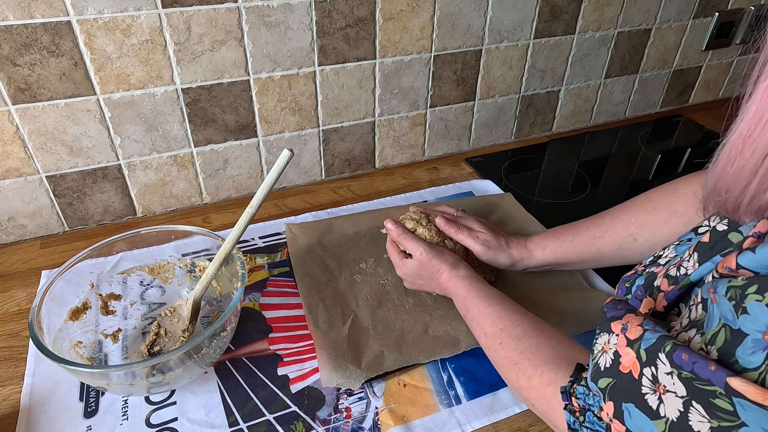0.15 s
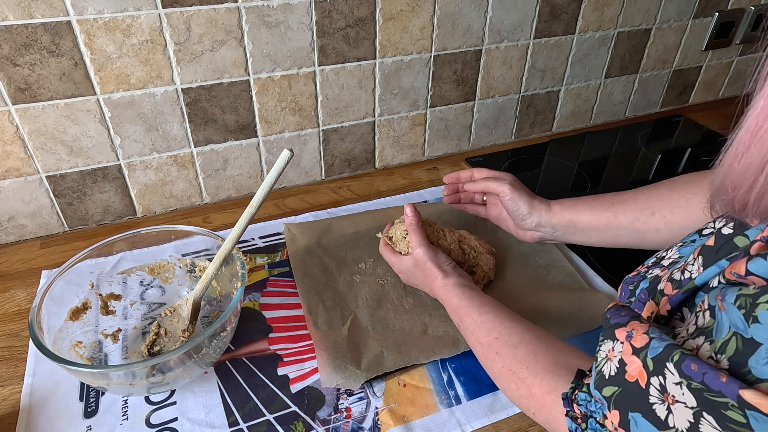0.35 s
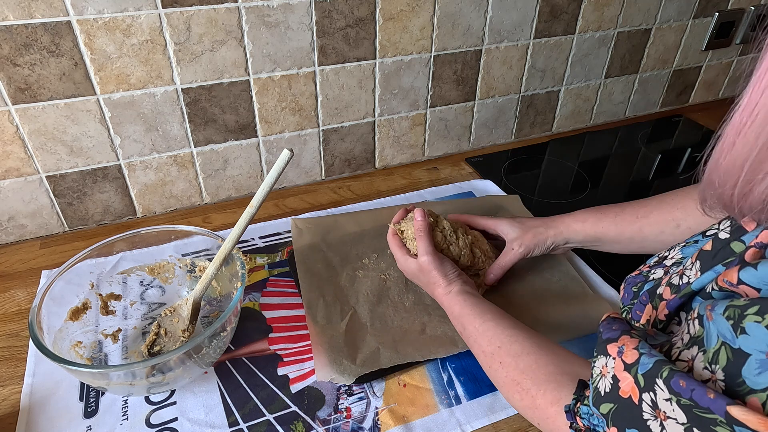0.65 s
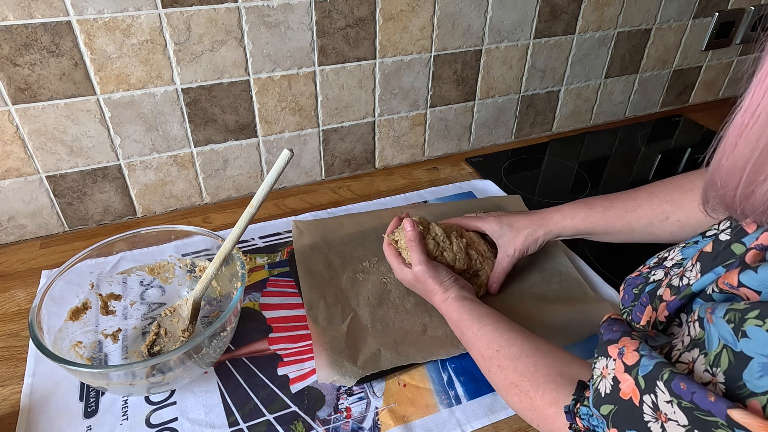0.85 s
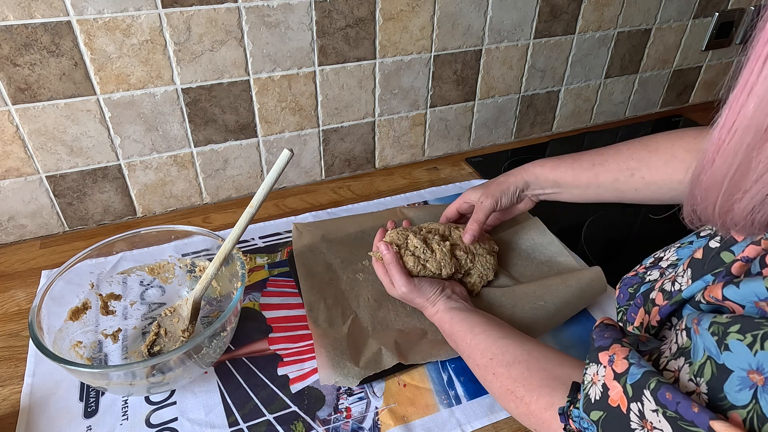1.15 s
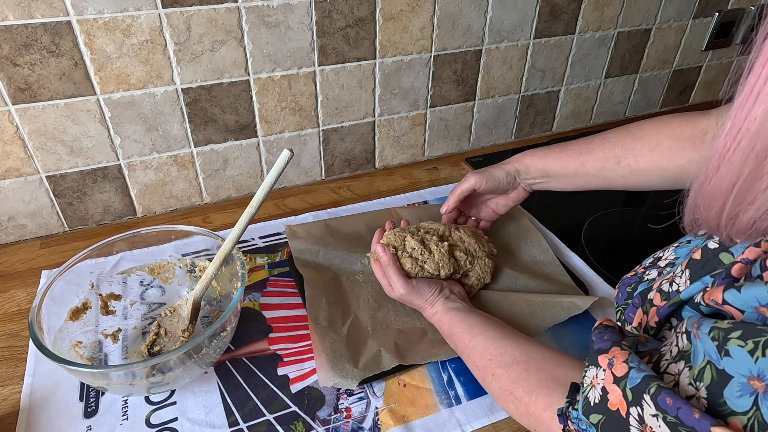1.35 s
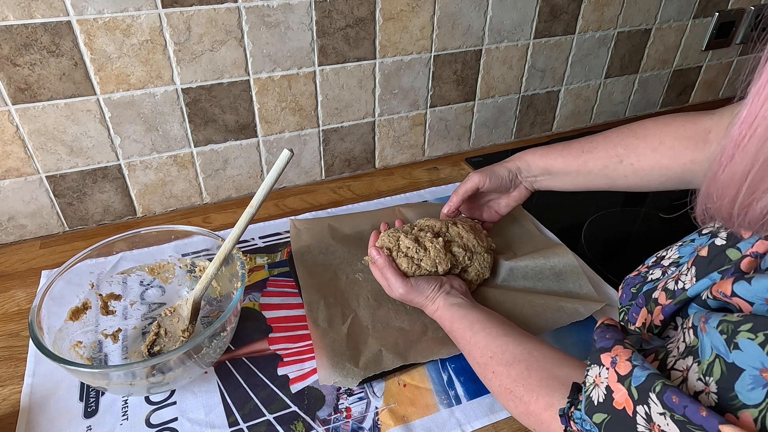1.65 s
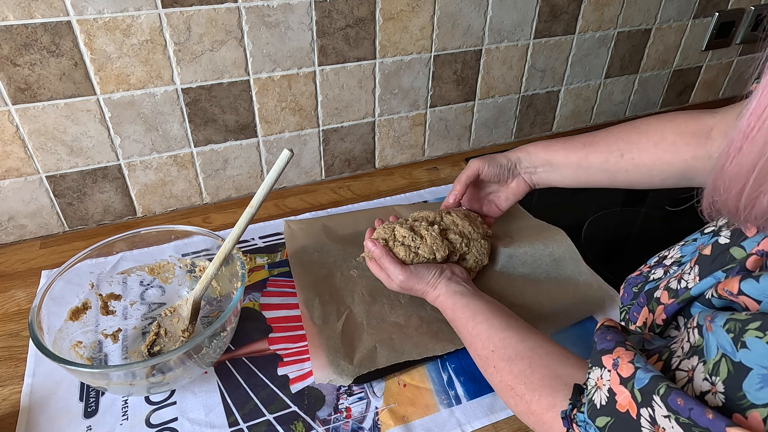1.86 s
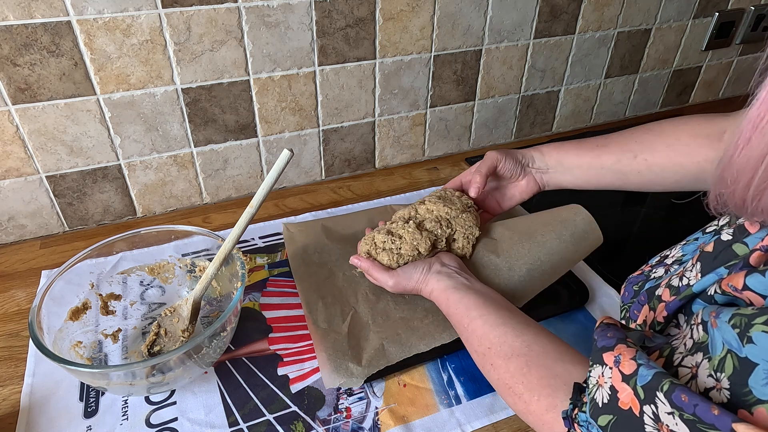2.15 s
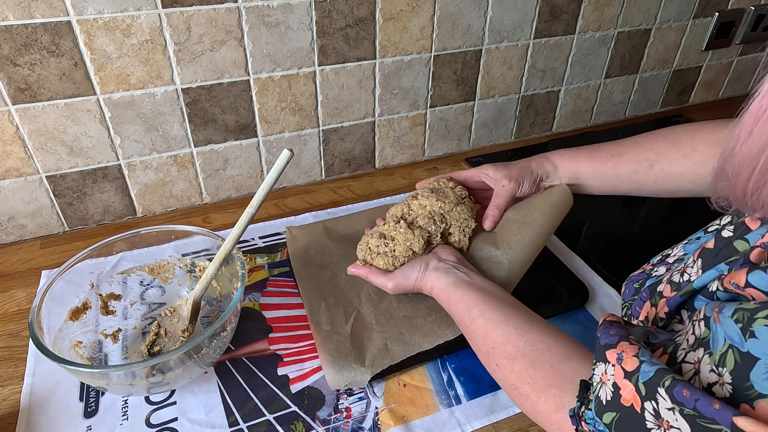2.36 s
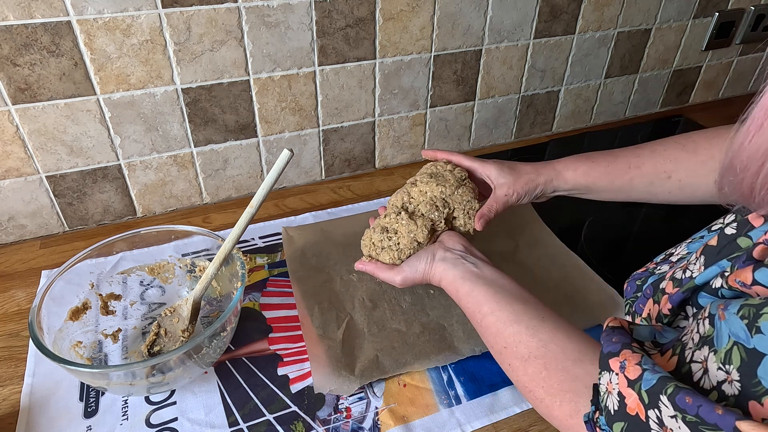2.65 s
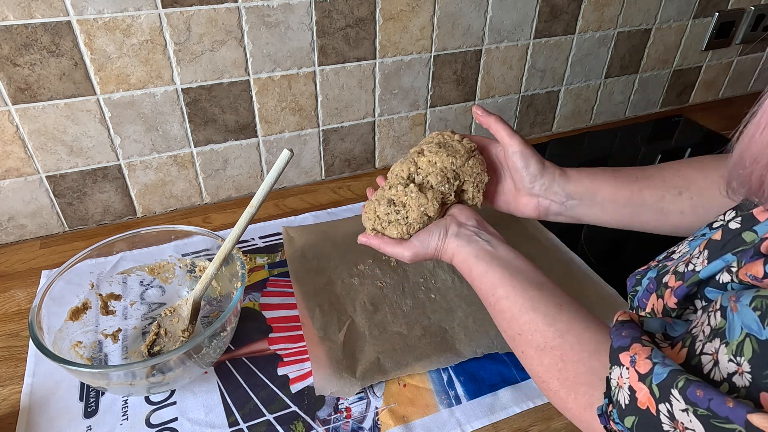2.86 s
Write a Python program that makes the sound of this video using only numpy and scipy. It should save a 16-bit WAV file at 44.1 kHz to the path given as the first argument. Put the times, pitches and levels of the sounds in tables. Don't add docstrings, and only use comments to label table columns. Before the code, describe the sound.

Baking paper crinkles and snaps under hands handling dough in a small kitchen, fridge humming faintly

```python
import sys
import numpy as np
from scipy import signal
from scipy.fft import rfft, irfft
from scipy.io import wavfile
from scipy.ndimage import uniform_filter1d

SR = 44100
rng = np.random.default_rng(int(sys.argv[2]) if len(sys.argv) > 2 else 0)


def master(y):
    cut = np.clip(np.atleast_2d(y).T, -1, 1)
    pcm = np.round(cut * 32767)
    wavfile.write(sys.argv[1], SR, pcm.astype(np.int16))


def ratio_of_db(decibels):
    return 10 ** (np.asarray(decibels, float) / 20)


N = 132300
SCATTER = 0.2

# f/Hz, level/dB rms
HUM_LINES = [(49.1, -42), (100, -104), (135, -69.5), (200, -67.5), (250, -71)]
# f/Hz, density/dB per Hz
AIR_SPECTRUM = [(41, -41), (70, -7.5), (108, -9.5), (254, -19.5), (840, -41.5), (1030, -35), (3820, -52),
                (7190, -40.5), (15500, -66)]
# f/Hz, t60/s
KITCHEN_T60 = [(300, 0.3), (1500, 0.45), (5000, 0.38), (12000, 0.28)]
# f/Hz, density/dB per Hz
COUNTER_SPECTRUM = [(100, -9.5), (170, 2.5), (350, 4), (750, -1.5), (1100, -10), (3000, -28.5)]
# t/s, level/dB, rise/s, t60/s
THUMPS = [
    (0.263, -35, 0.0012, 0.1),
    (.72, -42, 0.03, 0.23),
    (1.0, -51, .01, 0.36),
    (1.09, -56, 0.014, 0.12),
    (1.586, -45, 0.0049, 0.32),
    (1.97, -57, 0.021, 0.16),
    (2.41, -58, .01, 0.61),
]
# t/s, peak/dB, ring f/Hz
PATS = [(.2645, -37.5, 258), (.2645, -37.5, 423), (.2645, -36, 592), (.2645, -38, 730), (.294, -38.5, 595),
        (2.055, -31.5, 538), (2.129, -33.5, 950), (2.265, -40, 735), (2.41, -33, 746), (2.474, -42, 782),
        (2.663, -42.5, 750), (2.715, -46.5, 717)]
# f/Hz, density/dB per Hz
PAPER_SPECTRUM = [(200, -31.5), (600, -16), (1000, -5), (1700, 0), (3100, 0.5), (6800, -6), (8500, -13),
                  (15500, -26.5)]
# f/Hz, density/dB per Hz
FLEX_SPECTRUM = [(120, -26), (300, 0), (600, 1.5), (1000, 0), (2000, -1.5), (5000, -30.5)]
# t/s, peak/dB, ring f/Hz, treble/dB
SNAPS = [(0.2648, -21, 3500, -20), (0.599, -30, 3080, -15), (0.9667, -22, 1920, -17),
         (1.0036, -19, 1720, -24), (1.1064, -17, 3710, -18), (1.1727, -16, 2430, -20),
         (1.1937, -14, 2380, -24), (1.2211, -22, 1910, -22), (1.2675, -15, 3000, -21),
         (1.2968, -12, 3000, -21), (1.3927, -12, 5030, -16), (1.5514, -23, 2150, -21),
         (1.5833, -21, 3480, -20), (1.6901, -21, 3350, -15), (1.7145, -16, 2250, -19),
         (1.9205, -19, 2780, -24), (2.1291, -16, 4000, -16), (2.2957, -22, 2400, -23),
         (2.4219, -21, 3120, -21), (2.4703, -18, 4000, -21)]
# t/s, peak/dB, ring f/Hz, treble/dB
TICKS = [(0.2222, -44, 4500, -30), (0.4393, -35, 2800, -23), (0.5258, -46, 10000, -28),
         (0.5556, -37.5, 2640, -37), (0.6755, -24.5, 3170, -16), (0.7160, -20.5, 2960, -24),
         (0.7484, -28.5, 2830, -21), (0.792, -21, 2460, -24), (0.9814, -19.5, 1770, -20),
         (1.0454, -30, 1720, -17), (1.0858, -19.5, 2850, -27), (1.0964, -23, 2520, -15),
         (1.1783, -22, 6000, -21), (1.3456, -20.5, 3200, -22), (1.4554, -25.5, 2500, -14),
         (1.6048, -22.5, 2260, -21), (1.6588, -22.5, 2880, -15), (1.8591, -20, 3380, -31),
         (1.9713, -25, 1310, -19), (2.0142, -25, 3330, -33), (2.1412, -25.5, 3100, -9),
         (2.2853, -42, 3970, -23), (2.3545, -32, 3260, -29), (2.4098, -20.5, 2530, -29),
         (2.7706, -31.5, 2940, -32), (2.8347, -36.5, 2850, -24), (2.898, -31.5, 4740, -43)]
# t/s, peak/dB, ring f/Hz, treble/dB
FLICKS = [(0.5173, -45, 2700, -30), (0.5746, -39, 4500, -31), (0.5861, -33, 2000, -30),
          (0.6174, -29.5, 1910, -22), (0.6515, -28, 3220, -22), (0.7962, -24, 5960, -17),
          (0.8201, -29, 2770, -29), (1.2541, -24, 5500, -30), (1.2905, -21.5, 11000, -14),
          (1.641, -25.5, 2230, -19), (1.8105, -29.5, 1790, -24), (2.0443, -22, 6000, -17),
          (2.0505, -20, 2840, -18), (2.0585, -20, 3200, -15), (2.2576, -31, 2840, -31),
          (2.3839, -27.5, 2460, -25), (2.3947, -29, 2630, -24), (2.4274, -35, 2930, -18),
          (2.71, -38, 5500, -30), (2.8858, -38, 3700, -31)]
# centre t/s, length/s, level/dB, ring f/Hz, ring level/dB
CRUSHES = [(0.31, 0.044, -49, 2500, -11), (0.351, .015, -52, 2700, 2.5), (0.408, 0.029, -54.5, 2450, 1),
           (0.586, 0.033, -50.5, 1810, 1), (0.603, 0.0092, -44.5, 7500, 12.5),
           (0.63, 0.093, -49.5, 2890, 0), (0.71, 0.06, -35.5, 2870, -3.5), (0.746, 0.023, -37.5, 3520, -5),
           (.77, 0.022, -40, 2800, -13), (0.799, 0.028, -34.5, 2700, -9), (1.028, 0.17, -39.5, 2360, -1.5),
           (1.107, 0.02, -33.5, 3050, -5), (1.195, 0.012, -39, 2640, -6), (1.276, 0.041, -38, 2570, -11),
           (1.312, 0.064, -32.5, 2500, -16), (1.416, 0.029, -33, 3450, -26), (1.476, 0.047, -40, 2840, -14),
           (1.594, 0.047, -33.5, 2380, -9), (1.723, 0.02, -41, 3000, -13), (1.756, 0.02, -39.5, 6000, 4.5),
           (1.847, 0.055, -39.5, 2920, -7), (1.976, 0.038, -34, 2480, -5.5), (2.023, 0.036, -39, 2900, 2),
           (2.056, 0.029, -29, 3150, -2.5), (2.137, 0.012, -38, 2500, 0), (2.314, 0.033, -53, 2800, 7),
           (2.419, 0.052, -40, 2730, -8), (2.434, 0.018, -47, 3000, -3), (2.496, 0.061, -44.5, 2870, 5),
           (2.641, 0.028, -47, 4050, 3.5), (2.669, 0.04, -47, 2000, -2), (2.722, 0.052, -48, 2700, 6)]
# t/s, rustle level/dB, dullness/0-1
EFFORT = [(0, -76, .4), (.21, -79.5, .4), (0.229, -56.5, 0), (.42, -56.5, 0), (.5, -65, 0), (.57, -62.5, 0),
          (.66, -41, 0.3), (.86, -43.5, 0.53), (.94, -42.5, 0.6), (1.04, -40, 0.84), (1.3, -36, 0.46),
          (1.53, -47, 0.54), (1.65, -42.5, 0.34), (1.8, -47, 0.2), (2.02, -38.5, 0.69), (2.22, -51, 1),
          (2.58, -51, 0.7), (3, -61, 0)]
# f/Hz, gain/dB
TREBLE_RESPONSE = [(3200, 0), (4100, -2), (5200, 0), (8800, -1), (10500, 1.5), (11500, -2), (13500, -6),
                   (15700, -13)]


def evened(x):
    return x / np.sqrt(np.mean(x ** 2) + 1e-20)


def read(points, hz):
    f, value = np.transpose(points)
    return np.interp(np.log(hz + 1), np.log(f + 1), value)


def colour(x, points):
    log_gain = np.log(ratio_of_db(read(points, abs(np.fft.fftfreq(4096, 1 / SR)))))
    taps = np.fft.ifft(np.exp(np.conj(signal.hilbert(log_gain)))).real[:2048]
    taps = taps.reshape((1,) * (x.ndim - 1) + (-1,))
    return signal.oaconvolve(x, taps, axes=-1)[..., :N]


def ring(x, hz, width_hz):
    b, a = signal.iirpeak(min(hz, SR / 3), max(hz / width_hz, 0.3), SR)
    return signal.lfilter(b, a, x)


def highpass(order, hz):
    return signal.butter(order, hz, "high", fs=SR)


def drift(rate_hz):
    t = np.arange(N) / SR
    rates_hz = np.geomspace(rate_hz / 10, rate_hz, 20)
    return evened(sum(np.sin(2 * np.pi * (f * t + rng.random())) for f in rates_hz))


def crackle(per_s, clump_db=4.5, spread_db=3):
    clumps = ratio_of_db(clump_db * evened(uniform_filter1d(rng.standard_normal(N), 200)))
    size = ratio_of_db(spread_db * np.minimum(rng.exponential(1, N), 4))
    size = size * (rng.random(N) < clumps * per_s / SR)
    kind = rng.integers(0, 24, N)
    shapes = rng.standard_normal((24, 160))
    sides = np.linspace(-1, 1, 24)
    t = np.arange(160)
    out = np.zeros((2, N))
    for k in range(24):
        decay_samples = 5.6 + 4.6 * (k % 8)
        grain = evened(shapes[k] * np.exp(-t / decay_samples))
        train = signal.oaconvolve(size * (kind == k), grain)[:N]
        out[0] += (1 + SCATTER * sides[k]) * train
        out[1] += (1 - SCATTER * sides[k]) * np.roll(train, round(0.6 * sides[k]))
    return evened(out)


def room_tone():
    level_db = -58.5
    shared, left, right = rng.standard_normal((3, N))
    apart = 1.56 * signal.lfilter(*highpass(1, 600), np.array([left, right]))
    return ratio_of_db(level_db) * evened(colour(shared + apart, AIR_SPECTRUM))


def fridge():
    waver_db, low_db, rumble_db = 0.7, -58.5, -55
    rumble_hz, rumble_width_hz = 50, 14
    t = np.arange(N) / SR
    lines = np.zeros(N)
    for hz, db in HUM_LINES:
        level = np.sqrt(2) * ratio_of_db(db + waver_db * drift(11))
        lines += level * np.sin(2 * np.pi * (hz * t + rng.random()))
    noise = rng.standard_normal(N)
    low = evened(ring(noise[::-1], 32, 15))
    rumble = ring(noise, rumble_hz, rumble_width_hz)
    rumble = evened(ring(rumble, rumble_hz, rumble_width_hz))
    return lines + ratio_of_db(low_db) * low + ratio_of_db(rumble_db) * rumble


def kitchen(x):
    apart_hz, apart_db = 880, -3.5
    out = np.zeros((2, N))
    turn = np.arange(N) / SR * 40 / 6
    source = x.mean(0)
    for k in range(6):
        taps = np.zeros((2, SR // 2))
        at = np.arange(80, SR // 2 - 20, 20) + rng.integers(0, 20, (2, (SR // 2 - 81) // 20))
        np.put_along_axis(taps, at, rng.choice([-1.0, 1.0], at.shape), 1)
        hz, t, z = signal.stft(taps, SR, nperseg=128)
        decay = ratio_of_db(-60 * t / read(KITCHEN_T60, hz)[:, None])
        mid, side = signal.istft(z * decay, SR, nperseg=128)[1]
        side = ratio_of_db(apart_db) * signal.lfilter(*highpass(1, apart_hz), side)
        tail = np.array([mid + side, mid - side]) / np.linalg.norm(mid)
        distance = abs((turn - k / 6 + 0.5) % 1 - 0.5)
        share = np.cos(np.pi / 2 * np.minimum(6 * distance, 1))
        out += signal.fftconvolve((share * source)[None], tail, axes=1)[:, :N]
    return out


def knock():
    start, db, rise, t60 = np.transpose(THUMPS)
    t = np.maximum(np.arange(N)[:, None] / SR - start, 0)
    push = (ratio_of_db(db - 60 * t / t60) * np.minimum(t / rise, 1)).sum(1)
    return push * evened(colour(rng.standard_normal(N), COUNTER_SPECTRUM))


def pats():
    rise_s, t60_s = 0.0017, 0.043
    t = np.arange(6000) / SR
    out = np.zeros(N + 6000)
    for s, db, hz in PATS:
        at = round(s * SR)
        envelope = ratio_of_db(db - 60 * t / t60_s) * (1 - np.exp(-t / rise_s))
        out[at:at + 6000] += envelope * np.sin(2 * np.pi * hz * t)
    return out[:N]


def snaps(rows):
    rise_s, fall_s, peak_s = 0.0005, 0.0017, 0.004
    after_db, after_s = -14, 0.008
    ring_db, ring_q = -7, 7
    treble_ref_db, treble_slope, thin = -22, 1.5, 0.54
    t = np.arange(1200) / SR
    out = np.zeros((2, N + 1200))
    rise = np.exp((t - peak_s) / rise_s)
    fall = np.exp((peak_s - t) / fall_s) + ratio_of_db(after_db) * np.exp(-t / after_s)
    shape = np.minimum(rise, fall)
    draws = rng.standard_normal((len(rows), 1201))
    for (s, db, hz, treble_db), draw in zip(rows, draws):
        burst = colour(shape * np.tanh(draw[1:]), PAPER_SPECTRUM)[:1200]
        burst = burst + ratio_of_db(ring_db) * ring_q ** 0.5 * ring(burst, hz, hz / ring_q)
        treble = signal.filtfilt(*highpass(2, 6500), burst)
        burst = burst + (ratio_of_db(treble_slope * (treble_db - treble_ref_db)) - 1) * treble
        burst = signal.lfilter(*highpass(2, thin * hz), burst)
        burst = ratio_of_db(db) * burst / abs(burst).max()
        at = round((s + rise_s - peak_s) * SR)
        side = SCATTER * np.tanh(draw[0])
        out[0, at:at + 1200] += (1 + side) * burst
        out[1, at:at + 1200] += (1 - side) * np.roll(burst, round(4 * side))
    return out[:, :N]


def crushes():
    t = np.arange(N) / SR
    grains = evened(colour(crackle(3000, clump_db=2.5), PAPER_SPECTRUM))
    out = np.zeros((2, N))
    for s, length, db, hz, ring_db in CRUSHES:
        part = slice(max(int((s - 2 * length) * SR), 0), int((s + 3 * length) * SR))
        u = (t[part] - s) / length
        swell = np.exp(-(u * np.where(u < 0, 3, 2)) ** 2)
        clicks = grains[:, part]
        ringing = ratio_of_db(ring_db) * ring(clicks, hz, 0.74 * hz)
        out[:, part] += ratio_of_db(db) * swell * (clicks + ringing)
    return out


def rustle():
    fine_per_s, flex_per_s = 2000, 900
    uneven_db, flex_db = 1.2, -3
    s, db, dull = np.transpose(EFFORT)
    t = np.arange(N) / SR
    level = ratio_of_db(np.interp(t, s, db) + uneven_db * drift(30))
    fine = evened(colour(crackle(fine_per_s), PAPER_SPECTRUM))
    flex = evened(colour(crackle(flex_per_s), FLEX_SPECTRUM))
    flex_level = ratio_of_db(flex_db + 14.4 * (np.interp(t, s, dull) - 0.92))
    return level * (fine + flex_level * flex)


def scene():
    wet_db = -3.5
    paper = rustle() + crushes() + snaps(SNAPS) + snaps(TICKS) + snaps(FLICKS)
    near = paper + knock() + pats()
    return near + ratio_of_db(wet_db) * kitchen(near) + fridge() + room_tone()


def band_limit(x):
    return signal.sosfilt(signal.butter(12, 15710, fs=SR, output="sos"), x)


def record(dry):
    left_lag_samples, edge_hz = 0.4, 15710
    hz = np.fft.rfftfreq(N, 1 / SR)
    lag = np.array([[left_lag_samples], [0]])
    delay = np.exp(-2j * np.pi * hz / SR * lag)
    band = np.clip((edge_hz - hz) / 60, 0, 1)
    mix = irfft(rfft(dry) * delay * band * ratio_of_db(read(TREBLE_RESPONSE, hz)), N)
    return band_limit(mix)


dry = scene()
out = record(dry)
master(out)
```